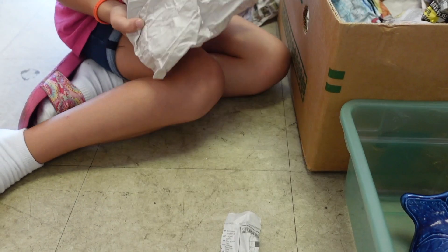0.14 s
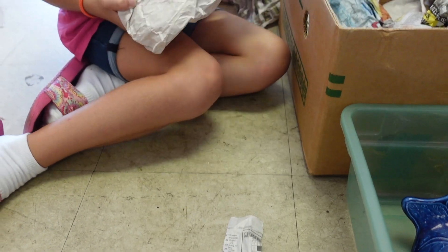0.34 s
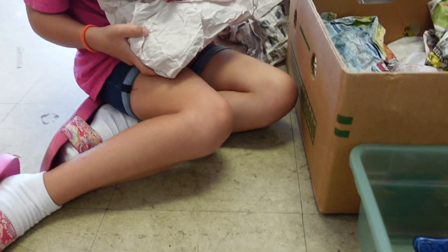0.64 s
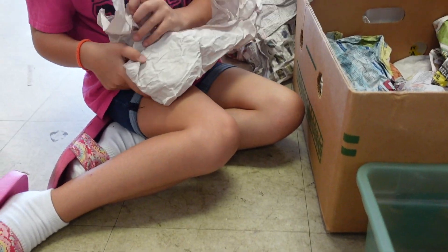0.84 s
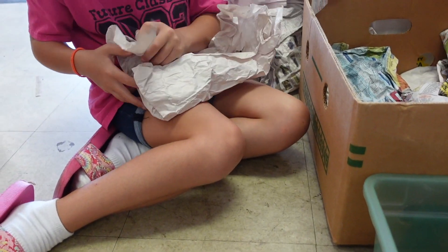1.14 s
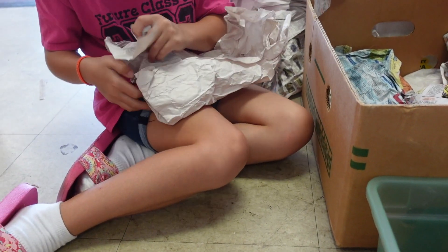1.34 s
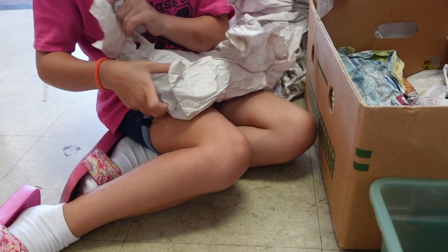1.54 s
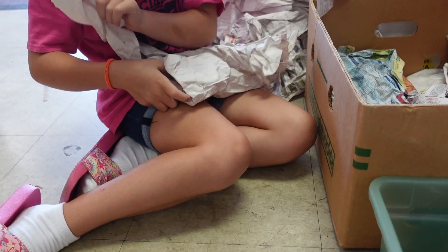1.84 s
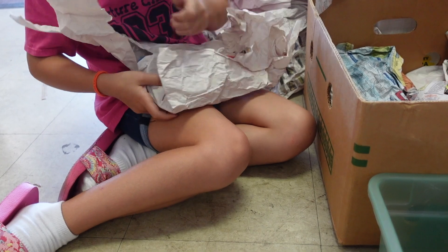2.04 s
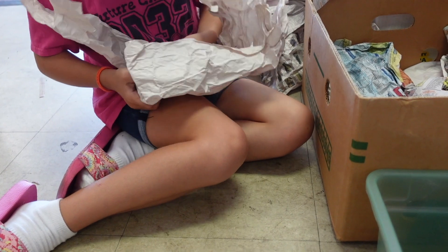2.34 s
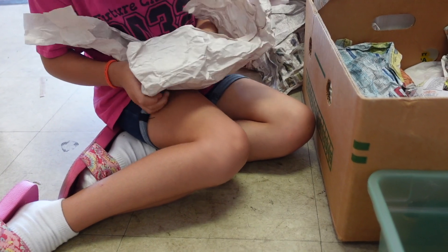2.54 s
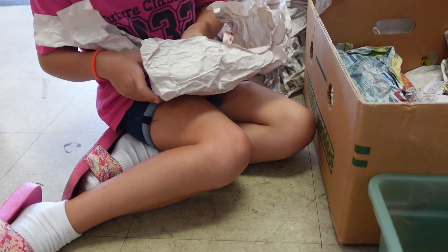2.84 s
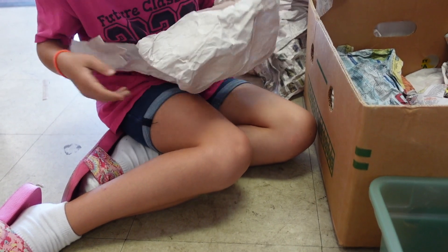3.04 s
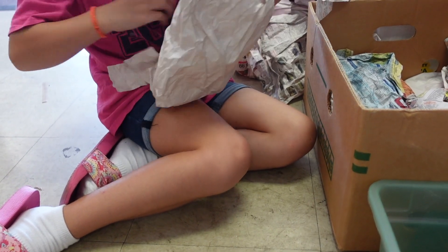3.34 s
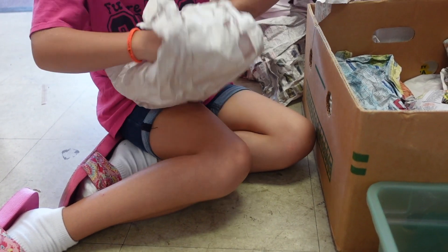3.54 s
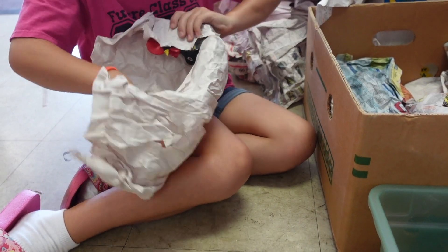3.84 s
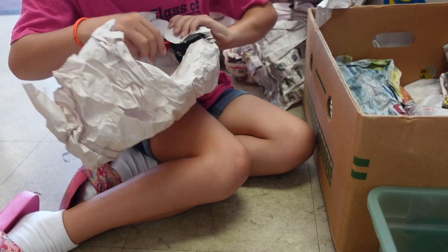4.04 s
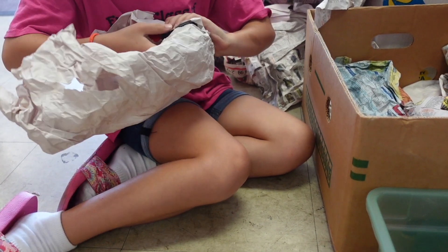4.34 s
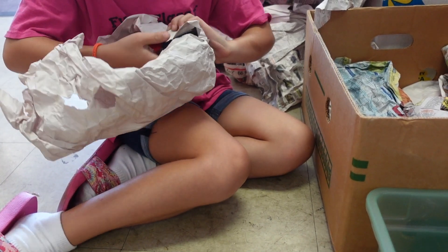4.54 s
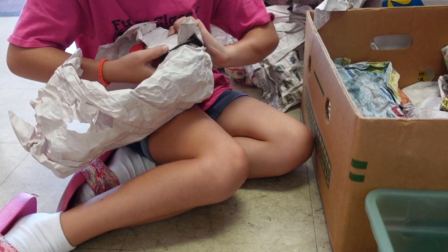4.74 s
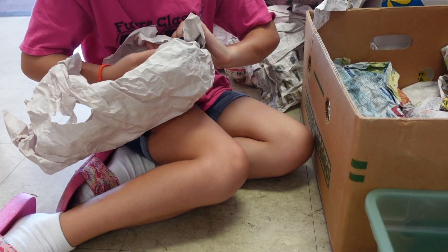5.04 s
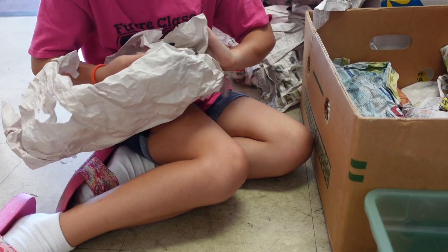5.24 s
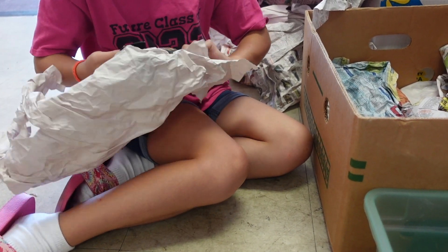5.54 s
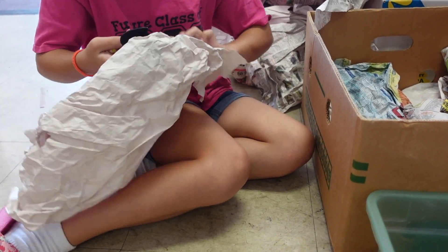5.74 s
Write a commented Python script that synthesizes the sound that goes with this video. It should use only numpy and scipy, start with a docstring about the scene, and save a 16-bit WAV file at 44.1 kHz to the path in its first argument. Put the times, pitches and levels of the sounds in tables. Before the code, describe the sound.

Stiff, dry paper crackles in uneven bursts as a wrapped item is uncovered. Crisp ticks and snaps ride on a grainy rustle, with dull boxy pops when flat areas buckle. It is busy until about three seconds, nearly pauses, surges again, then drops to light crinkles with a few clear cracks. Near, centred microphones; short, faint room reflections.

```python
"""Crumpled packing paper is pulled open by hand, close to a pair of microphones.
Noise and clumps of random clicks in third-octave bands make the rustle and its flurries; lone facets tick on top.
Creases snap as clicks through narrow and wide bands; flat panels give narrow pitched pops, some low, some high.
A short noise tail makes the room; steady shaped noise is its air, over a 60 Hz hum too faint to stand out."""
import sys
import numpy as np
from scipy import signal
from scipy.fft import rfft, irfft, next_fast_len
from scipy.io import wavfile

SR = 44100
rng = np.random.default_rng(int(sys.argv[2]) if len(sys.argv) > 2 else 0)


def to_wav(s):
    """Save 16-bit WAV."""
    ch = np.atleast_2d(s).T  # columns
    pcm = np.round(np.clip(ch, -1, 1) * 32767)  # PCM
    wavfile.write(sys.argv[1], SR, pcm.astype(np.int16))


N = 259749

# How hard the hands work the paper. Each row: time in seconds, steady rustle in dB before make-up gain.
HANDLING_EFFORT = [(0.0, -33.5), (0.34, -33), (0.45, -33.5), (0.6, -32.5), (0.74, -33.5), (0.78, -34),
                   (0.83, -30.5), (1.1, -35.5), (1.23, -39), (1.46, -27), (1.77, -23.5), (1.805, -35),
                   (1.85, -29), (2.08, -34), (2.2, -43), (2.24, -34.5), (2.36, -33), (2.45, -30),
                   (2.58, -28), (2.69, -37.5), (2.78, -39), (2.85, -37.5), (2.96, -31), (3.11, -38.5),
                   (3.16, -46), (3.2, -44), (3.31, -45), (3.335, -50), (3.37, -46.5), (3.5, -40),
                   (3.58, -27.5), (3.76, -29.5), (3.95, -33.5), (4.0, -43.5), (4.23, -48), (4.39, -52),
                   (4.5, -41.5), (4.75, -39), (4.95, -41), (5.02, -39.5), (5.12, -36.5), (5.25, -33),
                   (5.42, -33.5), (5.53, -45), (5.56, -41), (5.65, -43.5), (5.72, -39), (5.78, -42),
                   (5.89, -44.5)]
# Folds giving way in a rush of facets. Each row: start in seconds, length in seconds,
# rustle in dB before make-up gain.
FOLD_FLURRIES = [(0.046, 0.028, -27.5), (0.313, 0.094, -31), (0.537, 0.028, -29.5), (0.582, 0.0086, -35),
                 (0.655, 0.011, -31.5), (0.707, 0.019, -29.5), (0.87, 0.0092, -31), (0.972, 0.053, -18),
                 (1.174, 0.027, -34.5), (1.249, 0.0054, -36), (1.36, 0.011, -37), (1.491, 0.068, -23.5),
                 (1.638, 0.083, -24), (1.816, 0.0051, -24.5), (2.224, 0.0067, -31.5), (2.266, 0.074, -30),
                 (2.396, 0.018, -28), (2.457, 0.02, -27.5), (2.58, 0.067, -36.5), (2.804, 0.026, -35),
                 (2.848, 0.027, -33.5), (3.386, 0.014, -38), (3.441, 0.04, -35), (3.509, 0.011, -33),
                 (3.568, 0.017, -25.5), (3.71, 0.037, -28.5), (3.784, 0.004, -28), (3.948, 0.021, -29.5),
                 (4.025, 0.013, -39), (4.257, 0.1, -41.5), (4.432, 0.013, -47), (4.547, 0.054, -35.5),
                 (4.785, 0.0056, -32), (4.799, 0.012, -31.5), (4.947, 0.02, -34), (5.041, 0.016, -34),
                 (5.289, 0.12, -33.5), (5.457, 0.088, -35), (5.585, 0.035, -38.5), (5.679, 0.014, -38.5)]
FLURRY_RISE_DB_PER_S, FLURRY_FALL_DB_PER_S = 3000, 606
# Spectrum of the rustling paper. Each row: frequency in Hz, relative density in dB per Hz.
PAPER_SPECTRUM = [(150, -54), (300, -28.5), (500, -16.5), (800, -6), (1000, -2.5), (1800, -5.5),
                  (3200, -2.5), (5700, -6), (10000, -15), (13000, -25.5), (15500, -26)]
# Colour of the rustle as the bundle opens. Each row: time in seconds, hollow body in dB re rustle,
# crisp treble in dB re rustle.
OPENING_COLOUR = [(0.0, -4, 1.5), (0.5, 1.5, 1.5), (0.95, -1.5, -1.5), (1.15, 3, 2.5), (1.4, -2, -0.5),
                  (1.7, 3.5, 1.5), (2.1, 0.5, -0.5), (2.45, -1.5, -4), (2.75, -1.5, -0.5), (3.052, -4, 0),
                  (3.7, 2, -2), (4.1, 1, -1), (4.35, 3, 0), (4.6, -1, -1), (5.2, 0, -1), (5.89, 0, 0.5)]
BODY_HZ, FACET_HZ, CRISP_HZ = 1000, 2900, 9100   # body acts in full below the first, crispness above the last
RUSTLE_MAKEUP_DB = 7.5
TICKS_PER_S, TICK_CYCLES, TICK_DB = 500, 17, -13.5   # cycles to fall 60 dB; level re rustle before make-up

# Buckling creases. Each row: time in seconds, click peak in dB, facet pitch in Hz, crack in dB re click peak,
# sheet slap in dB re click peak; the sheet's range filters them afterwards.
CREASE_SNAPS = [(0.051,-18,2660,-20,4),(.073,-42,3900,-17,-6),(.218,-21.5,4020,-16,1),(.275,-16,3280,-22,-4),(.285,-16,7260,-27,-20),(0.3006,-19.5,3020,-25,1.5),
                (.322,-24,3240,4,1),(.336,-19,3980,-3,1),(0.344,-11,6470,-5,-3),(.364,-20,3290,2,6.5),(.41,-22,3270,9,3),
                (.4232,-16.5,8400,-7,2),(0.4652,-21,7660,-16,0),(.4787,-25.5,4180,-14,4),(0.499,-25,2900,2,8),(0.5172,-12.5,3500,-29,3),(0.5384,-18.5,3000,-24,-12),(0.5436,-15,5500,-20,1),(0.549,-12,2920,-30,-6),
                (0.56,-13,3170,-21,-1.5),(0.5852,-22,2840,1,8.5),(0.5998,-16,6300,-19,-4),(0.6345,-18,3000,-20,4.5),(0.651,-25,3940,-12,10.5),
                (.661,-13,3080,-1,-17),(.7105,-17,3000,-7,8.5),(0.721,-13,2910,-16,-15),(0.821,-23,3060,-17,-16),(.8416,-21,4270,-8,-6),
                (.874,-12,4330,-23,-7),(0.881,-20.5,2100,-19,6.5),(.901,-27,3000,5,4),(0.9577,-20,2780,-20,-8),(0.9786,-13,3340,-24,3),(0.991,-9.5,3270,2,0),
                (1.0271,-11,3000,-19,-23),(1.19,-22,4050,-20,-3),(1.204,-23.5,2370,-1,4),(1.264,-28,4000,-10,10),(1.2998,-9,3900,-17,-3),
                (1.3541,-21,2410,-17,8),(1.4025,-27.5,2930,-8,13),(1.469,-25.5,1470,7,8),(1.5425,-10.5,5440,-4,-7),(1.561,-20,1540,-10,-10),(1.593,-21,2980,-12,7),(1.612,-14,3400,4,-18),
                (1.625,-15.5,7400,6.5,6),(1.641,-14,4030,0.5,-14),(1.6473,-18,3200,-13,-13),(1.6731,-14.5,3130,7.5,3),(1.701,-17,3500,4.5,8),(1.7246,-17.5,1890,-15,6),
                (1.753,-11.5,5400,-15,-3),(1.771,-14.5,1430,-6,4),(1.819,-24,3640,-18,5),(1.875,-20,2430,-19,0),(1.9,-25.5,3070,-8,7),
                (1.969,-20,4500,4,2),(2.006,-19,4160,-17,-15),(2.0405,-19,5400,-4,0),(2.2316,-23.5,4870,-21,3.5),(2.2465,-17.5,2740,-20,-15),
                (2.2695,-10.5,2960,-29,-17),(2.2922,-29,2570,-20,-13),(2.3108,-19,3220,-18,-18),(2.324,-21,1590,-20,-4),(2.3788,-22.5,2070,-2,6),(2.3988,-14.5,3150,-23,0),
                (2.4103,-18,3080,-24,-5),(2.4184,-14,1600,-9,3),(2.4437,-17,4970,-21,2.5),(2.452,-17,2460,-15,-5),(2.4675,-10.5,2700,-31,-1.5),
                (2.4822,-12.5,2780,-29,-1),(2.5004,-20,2350,-20,-8),(2.5162,-23.5,2680,-12,7),(2.533,-15,4650,-13,-2),(2.546,-17.5,3120,-5,2),(2.58,-16,2450,-21,1),
                (2.5872,-12,4600,-14,-23),(2.651,-21.5,4940,-8,1),(2.7026,-22.5,2970,-20,-16),(2.767,-33,2500,-13,-4),(2.797,-31,2960,-15,11),
                (2.8632,-28,2730,-12,-6),(2.9537,-24.5,1580,-16,7.5),(2.986,-20,3280,-29,-17),(2.993,-26,3400,-24,-26),(3.0548,-16,3200,-19,-10),
                (3.3496,-36.5,1340,-22,11),(3.355,-20,5060,-36,-5.5),(3.3943,-20.5,4940,-23,-14),(3.45,-28,2700,2.5,4),(3.48,-23,2970,-19,4),
                (3.521,-16.5,5700,-20,-1),(3.531,-21,5460,-20,4),(3.5497,-13,5300,-28,0.5),(3.572,-15.5,2280,-19,-12),(3.5875,-23,5450,-24,0),(3.673,-23,7000,-5,2),
                (3.6819,-19,6100,-13,-9),(3.691,-18,2010,-20,-12),(3.741,-17,5800,-9,2.5),(3.7856,-22,2930,1,-7),(4.213,-24,9100,-14,-13),(4.3622,-33,2400,-18,-14),
                (4.4132,-31,3800,-15,-9),(4.5285,-26,2350,-18,-8),(4.562,-18,3840,-28,-24),(4.6245,-27.5,2500,-17,3),(4.666,-25,3100,-22,-22),(4.7871,-26,2530,-1,7),(4.8212,-16.5,2900,-20,-4),(4.8259,-18,4240,-25,-7),(4.8316,-12.5,4540,-12,-6),
                (4.888,-10.5,3260,-15.5,-12.5),(4.955,-38,1870,-20,9),(4.966,-39,1800,-20,-3),(4.982,-17,2800,-31,5),(5.067,-23,2570,-22,-14),
                (5.099,-13.5,6300,-3,3.5),(5.169,-23,2890,-14,-9),(5.3623,-17,4900,-7,2),(5.382,-24,3560,-13,4),(5.395,-31,2500,12,6),(5.4827,-25,2860,-6,-2),
                (5.534,-21,2420,-20,-15),(5.676,-26,4800,-24,-14),(5.6973,-30,3120,-15,5.5)]
LEAD_S = 0.0003   # snaps and pops start this far ahead of their listed time
FACET_WIDTH = 1.35   # band edge re facet pitch
RING_LAG_S, RING_DB, RING_WIDTH = 0.00045, -8.5, 1.1   # then the facet rings on in a narrow band
SHIVER_DB = -25.5   # the sheet's shiver after a click, re that click, before filtering
PLACE_SIDE_DB = -24.5   # creases lie a little left or right of the middle: typical side re mid
SHEET_LOW_HZ, SHEET_HIGH_HZ = 465, 11300   # the range in which creases and panels sound

# Flat panels of the bundle giving way. Each row: time in seconds, peak in dB before the sheet's range
# filters it, pitch in Hz.
PANEL_POPS = [(0.516, -24, 925), (0.584, -18, 1000), (0.633, -20, 1050), (0.976, -27, 1070),
              (1.078, -21.5, 1080), (1.161, -23.5, 1300), (1.478, -14, 1000), (1.515, -16.5, 1050),
              (1.54, -16.5, 1170), (1.624, -23, 1080), (1.707, -14.5, 980), (1.86, -22, 960),
              (1.9, -21.5, 805), (3.548, -26, 1250), (3.787, -23, 1010), (4.329, -33.5, 1160),
              (5.17, -23.5, 2700), (5.362, -26, 1690), (5.476, -27, 2950), (5.482, -28, 2930),
              (5.51, -28, 3200), (5.681, -29, 1010)]
POP_HALF_WIDTH_HZ = 197

# Spectrum of the room air. Each row: frequency in Hz, relative density in dB per Hz.
AIR_SPECTRUM = [(30, -24), (100, -12.5), (300, -10.5), (1000, 5.5), (4000, 10.5), (15000, -3.5)]
# Side share of the room air. Each row: frequency in Hz, gain of the side's own air in dB re mid air.
AIR_SIDE = [(40, -11), (130, -22), (300, 7), (1000, 6), (3000, -12), (14000, -54)]
AIR_DB, HUM_DB, HUM_HZ = -56, -101, 60   # typical levels: air as rms, hum as sine peak

ROOM_T60_S, ROOM_DB, WALL_CUT_HZ = 0.22, -13.5, 54000   # tail energy re the direct paper
# Uneven stereo difference: level of a second noise tail in the side, per frequency.
# Each row: frequency in Hz, side tail in dB re the direct paper.
SIDE_TAIL = [(40, -10), (120, -38), (300, -15), (700, -19), (3000, -88), (8000, -33), (14000, -10)]
# Lean of the direct paper to the left. Each row: frequency in Hz, direct side in dB re mid.
DIRECT_LEAN = [(100, -61), (4000, -36), (8000, -30), (14000, -17)]
CUTOFF_HZ = 16000   # 60 dB down from here up


def from_db(db):
    """Decibels to gain."""
    return 10 ** (np.asarray(db) / 20)


def rms_one(x):
    """Scales to rms 1."""
    return x / np.sqrt(np.mean(x ** 2) + 1e-20)


def at_hz(points, hz):
    """Reads a spectrum on a log-frequency axis."""
    point_hz, point_db = np.transpose(points)
    return np.interp(np.log(hz), np.log(point_hz), point_db)


def colour(x, points):
    """Shapes a whole track by a spectrum, leaving its phases alone."""
    size = next_fast_len(N)
    hz = np.maximum(np.arange(size // 2 + 1) * SR / size, 1)
    return irfft(rfft(x, size) * from_db(at_hz(points, hz)), size)[:N]


def band(x, low_hz, high_hz, order=2):
    """Butterworth band-pass."""
    edges = [low_hz, min(high_hz, SR / 2.2)]
    return signal.sosfilt(signal.butter(order, edges, "band", fs=SR, output="sos"), x)


def drift(rate_hz):
    """Slow chance of rms 1: noise at every 20th sample through a double one-pole low-pass."""
    r = np.exp(-2 * np.pi * rate_hz * 20 / SR)
    noise = rng.standard_normal(N // 20 + 2002)
    slow = signal.lfilter([1], [1, -2 * r, r * r], noise)[2000:]   # the filter has settled by then
    return np.interp(np.arange(N) / 20, np.arange(len(slow)), rms_one(slow))


def random_clicks(per_s, spread_db):
    """Single-sample clicks of uneven size and either sign at random times; rms 1."""
    sizes = from_db(spread_db * np.minimum(rng.exponential(1, N), 3.5))
    signs = rng.choice([-1, 1], N)
    return rms_one(sizes * signs * (rng.random(N) < per_s / SR))


def shivering(clicks, noise, t60, level_db):
    """After each click the sheet around it shivers: noise under a dying envelope."""
    power = signal.lfilter([0, 1], [1, -from_db(-120 / (t60 * SR))], clicks ** 2)
    return clicks + from_db(level_db) * np.sqrt(power) * noise


def flutter(noise, t60, level_db):
    """One click, then the sheet around it shivers as noise that falls 60 dB in t60 seconds."""
    shiver = from_db(level_db - 60 * np.arange(len(noise)) / (t60 * SR)) * noise
    return np.concatenate([[1], shiver[1:]])


def add(out, s, peak_db, sound, place=1):
    """Lays a sound into the track at its peak level."""
    at = round((s - LEAD_S) * SR)
    out[..., at:at + len(sound)] += from_db(peak_db) * place * sound / np.abs(sound).max()


def effort():
    """Rustle level in dB: powers of steady handling and of flurries that rise fast, hold and die away add up."""
    t = np.arange(0, N, 20) / SR
    power = from_db(2 * np.interp(t, *np.transpose(HANDLING_EFFORT)))
    for s, length, level_db in FOLD_FLURRIES:
        before_s = np.maximum(s - t, 0)
        after_s = np.maximum(t - s - length, 0)
        below_db = FLURRY_RISE_DB_PER_S * before_s + FLURRY_FALL_DB_PER_S * after_s
        power = power + from_db(2 * (level_db - below_db))
    return np.interp(np.arange(N) / SR, t, 10 * np.log10(power))


def ticks(level_db):
    """Lone facets flick over: clicks dealt among 24 two-pole resonators, each ringing briefly at its pitch."""
    clicks, dealt = random_clicks(TICKS_PER_S, spread_db=4.0), rng.integers(0, 24, N)
    out = 0
    for k, hz in enumerate(np.geomspace(1300, 10500, 24)):
        r, turn = from_db(-60 * hz / (TICK_CYCLES * SR)), 2 * np.pi * hz / SR
        blows = clicks * (dealt == k) + 1e-18   # the tiny offset keeps the filter off denormals
        ring = signal.lfilter([np.sin(turn)], [1, -2 * r * np.cos(turn), r * r], blows)
        out = out + from_db(at_hz(PAPER_SPECTRUM, hz)) * np.sqrt(hz) * ring
    return from_db(TICK_DB + level_db) * rms_one(band(out, 610, 10500, order=3))


def rustle():
    """Third-octave bands of facets: wide clicks in all bands, small clicks in a few, and sliding hiss."""
    rustle_db, (s, body_db, crisp_db) = effort(), np.transpose(OPENING_COLOUR)
    clump = drift(90.0)      # facets give way in avalanches
    hiss = rng.standard_normal((2, N))
    wide = random_clicks(500 * from_db(4.6 * clump), spread_db=6.5)
    edges = 140 * 2 ** (np.arange(22) / 3)
    out = 0
    for k, (low, high) in enumerate(zip(edges, edges[1:])):
        hz = np.sqrt(low * high)
        if k % 3 == 0:      # one size of facet sounds over about an octave
            small = random_clicks((100 + 0.031 * hz) * from_db(2.8 * clump), spread_db=0.5)
        clicks = from_db(-13.5) * wide + from_db(-10.5) * small
        crackle = shivering(clicks, hiss[k % 2], t60=0.036, level_db=-19.5)
        grains = crackle + from_db(-8.5 + 1.8 * clump) * hiss[k % 2]
        # body and crispness bend the spectrum below and above the facet pitch
        body = at_hz([(BODY_HZ, 1), (FACET_HZ, 0)], hz)
        crisp = at_hz([(FACET_HZ, 0), (CRISP_HZ, 1)], hz)
        bend = np.interp(np.arange(N) / SR, s, body * body_db + crisp * crisp_db)
        level_db = rustle_db + bend + at_hz(PAPER_SPECTRUM, hz)
        # each band also wavers by itself
        out = out + from_db(level_db + 1.94 * drift(26.4)) * band(grains, low, high)
    return from_db(RUSTLE_MAKEUP_DB) * out + ticks(rustle_db)


def air():
    """Quiet room air: shaped noise that swells and sinks a little."""
    return from_db(AIR_DB + 2.0 * drift(12.0)) * rms_one(colour(rng.standard_normal(N), AIR_SPECTRUM))


def hum():
    """A trace of mains hum: one sine of wavering level."""
    return from_db(HUM_DB + 4.3 * drift(4.2)) * np.sin(2 * np.pi * HUM_HZ * np.arange(N) / SR)


def snaps():
    """Each buckling crease rings its facet, slaps the whole sheet and cracks on top; returns mid and side."""
    out, noises = np.zeros((2, N + 2000)), rng.standard_normal((len(CREASE_SNAPS), 2000))
    for (s, peak_db, facet_hz, crack_db, slap_db), noise in zip(CREASE_SNAPS, noises):
        sign = np.sign(noise[0])
        blow = sign * flutter(noise, t60=0.014, level_db=SHIVER_DB)
        ring = flutter(noise[::-1], t60=0.026, level_db=-7.0)
        slap = sign * flutter(noise[::-1], t60=0.027, level_db=-17.0)
        crack = flutter(noise, t60=0.0099, level_db=-11.0)
        place = np.array([[1], [from_db(PLACE_SIDE_DB) * noise[1000]]])   # mid and random side
        click = band(blow, facet_hz / FACET_WIDTH, facet_hz * FACET_WIDTH)
        ring = band(ring, facet_hz / RING_WIDTH, facet_hz * RING_WIDTH)
        add(out, s, peak_db, click, place)
        add(out, s + RING_LAG_S, peak_db + RING_DB, ring, place)
        add(out, s, peak_db + slap_db, band(slap, 1190, 6180), place)
        add(out, s, peak_db + crack_db, band(crack, 6000, 12300, order=3), place)
    return band(out[:, :N], SHEET_LOW_HZ, SHEET_HIGH_HZ)


def panel_pops():
    """A flat panel gives way: a click and its shiver, heard through a narrow band at the panel's pitch."""
    out, noises = np.zeros(N + 2000), rng.standard_normal((len(PANEL_POPS), 2000))
    for (s, peak_db, panel_hz), noise in zip(PANEL_POPS, noises):
        blow = np.sign(noise[0]) * flutter(noise, t60=0.08, level_db=-26.5)
        add(out, s, peak_db, band(blow, panel_hz - POP_HALF_WIDTH_HZ, panel_hz + POP_HALF_WIDTH_HZ))
    return band(out[:N], SHEET_LOW_HZ, SHEET_HIGH_HZ)


def room(x):
    """Reflections as two unlike tails of dying noise, after a 4 ms gap."""
    t = np.arange(SR // 2) / SR
    tails = rng.standard_normal((2, len(t))) * from_db(-60 * t / ROOM_T60_S) * (t > 0.004)
    # one-pole low-pass for the walls, set so high that the tails stay almost flat
    tails = signal.lfilter([1], [1, -np.exp(-2 * np.pi * WALL_CUT_HZ / SR)], tails)
    tails = tails / np.sqrt(np.sum(tails ** 2, axis=1, keepdims=True))   # energy 1
    return signal.fftconvolve(x[None], tails, axes=1)[:, :N]


def scene():
    """Left and right share one mid; a side of leaning paper, an uneven second tail and its own air is +/-."""
    creases, creases_side = snaps()
    paper = rustle() + creases + panel_pops()
    tail, other_tail = room(paper)
    mid = paper + from_db(ROOM_DB) * tail + air() + hum()
    paper_side = creases_side + colour(paper, DIRECT_LEAN)
    side = paper_side + colour(other_tail, SIDE_TAIL) + colour(air(), AIR_SIDE)
    return np.array([mid + side, mid - side])


def record(dry):
    """A steep low-pass cuts the top."""
    return signal.sosfilt(signal.cheby2(14, 60, CUTOFF_HZ, fs=SR, output="sos"), dry)


dry = scene()
out = record(dry)
to_wav(out)
```